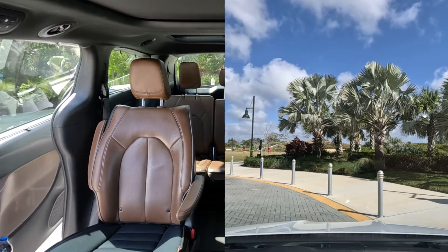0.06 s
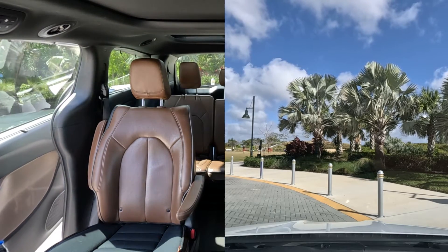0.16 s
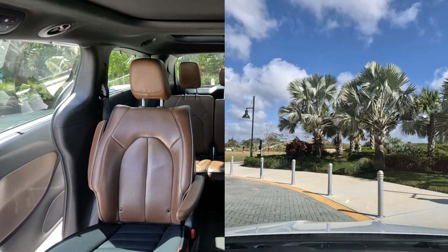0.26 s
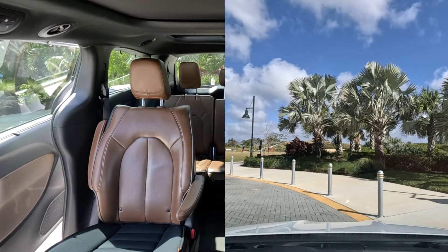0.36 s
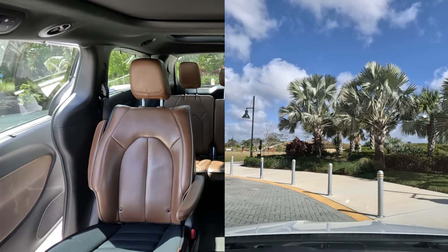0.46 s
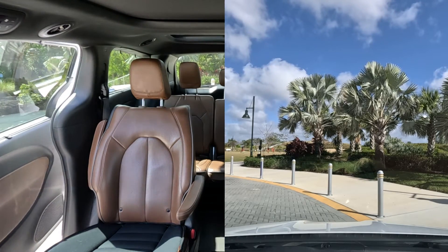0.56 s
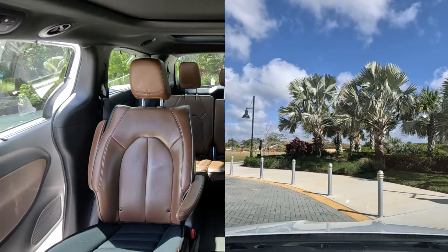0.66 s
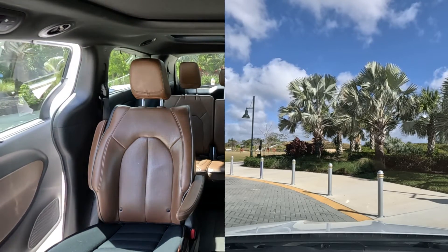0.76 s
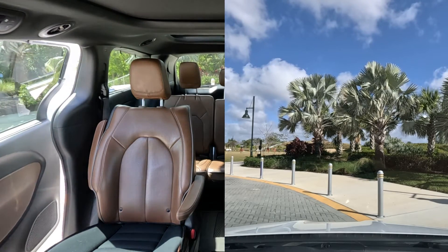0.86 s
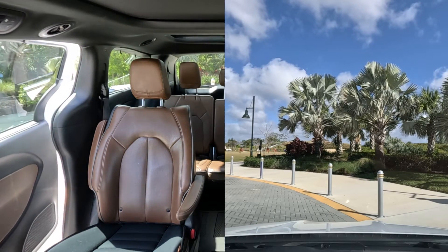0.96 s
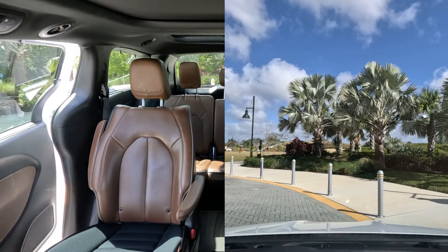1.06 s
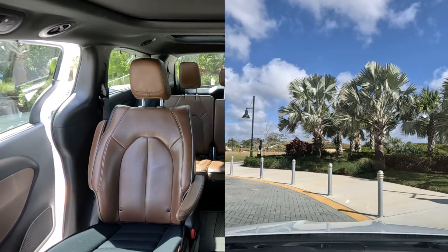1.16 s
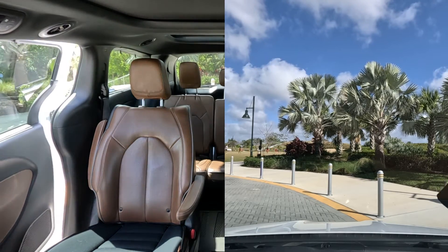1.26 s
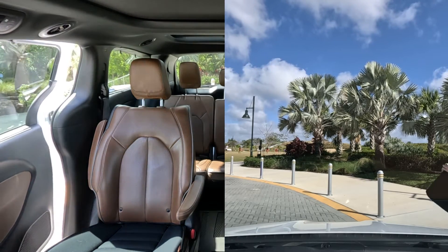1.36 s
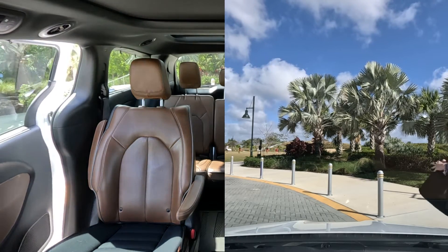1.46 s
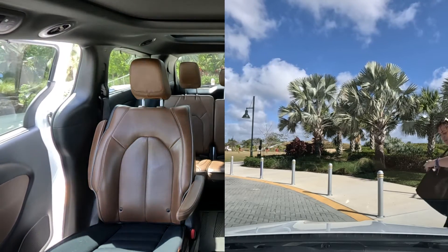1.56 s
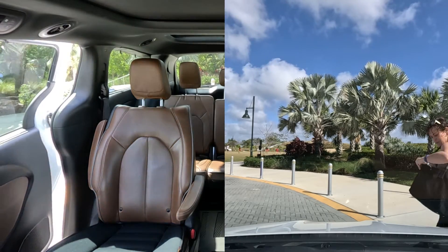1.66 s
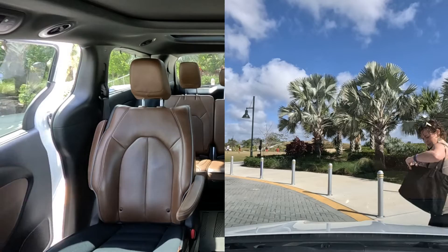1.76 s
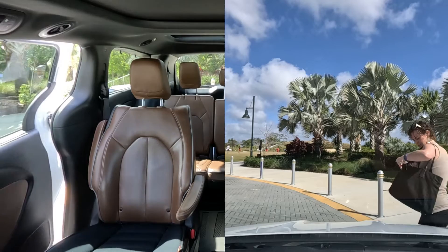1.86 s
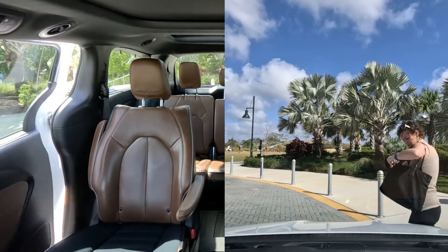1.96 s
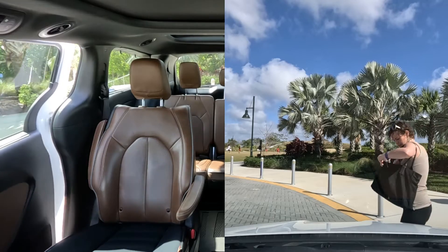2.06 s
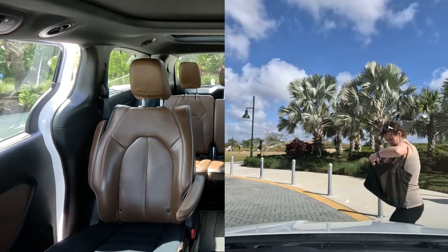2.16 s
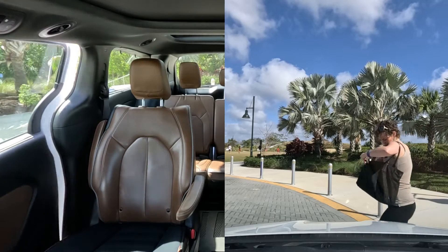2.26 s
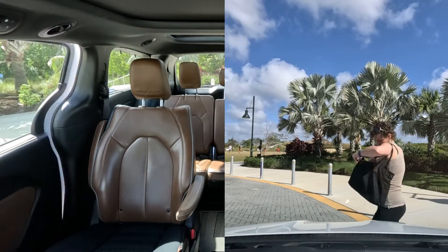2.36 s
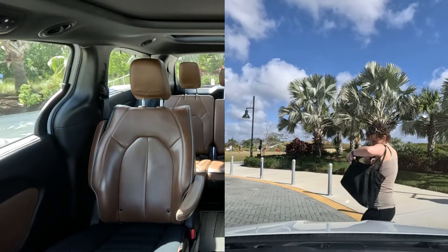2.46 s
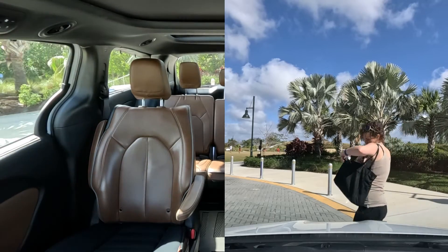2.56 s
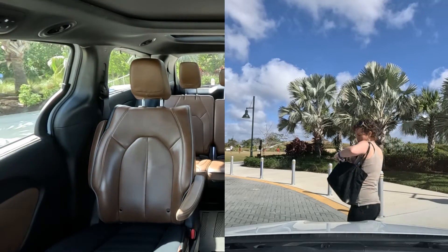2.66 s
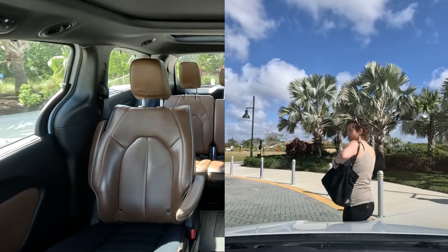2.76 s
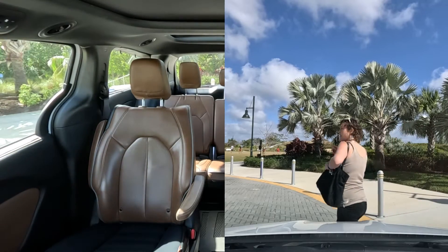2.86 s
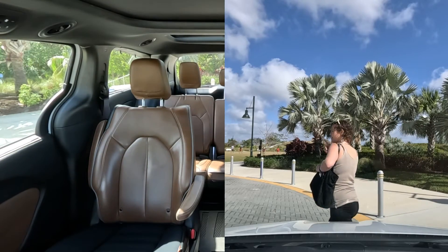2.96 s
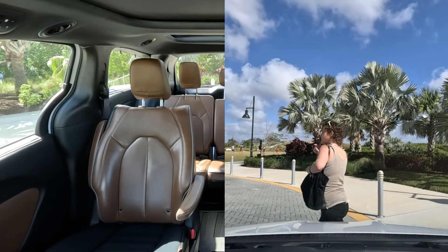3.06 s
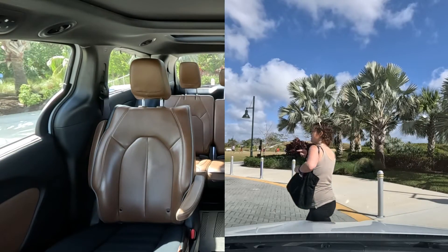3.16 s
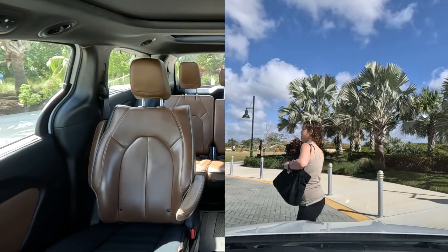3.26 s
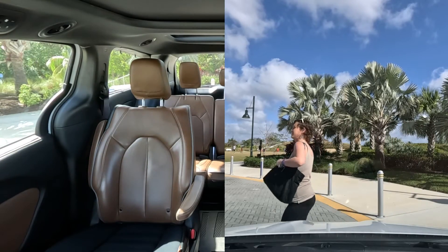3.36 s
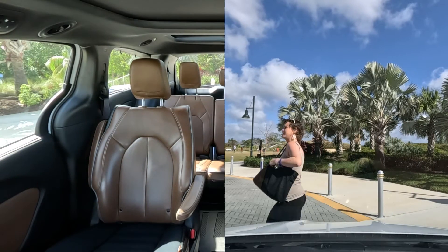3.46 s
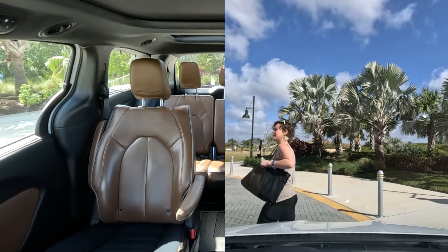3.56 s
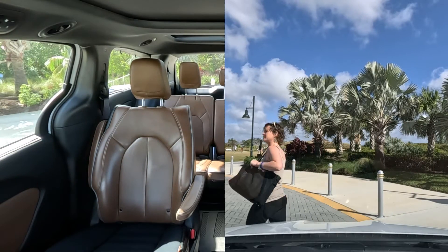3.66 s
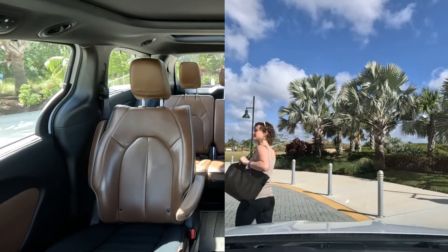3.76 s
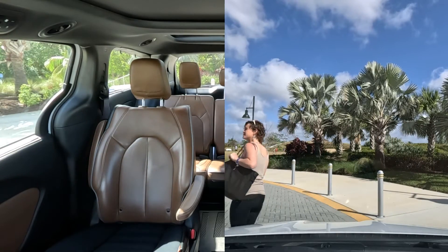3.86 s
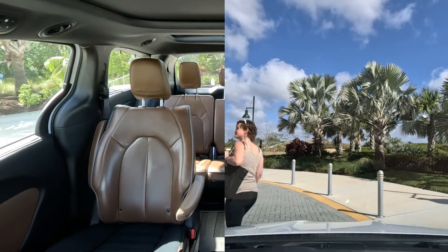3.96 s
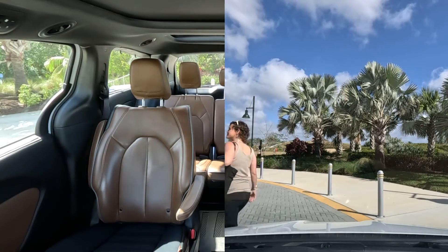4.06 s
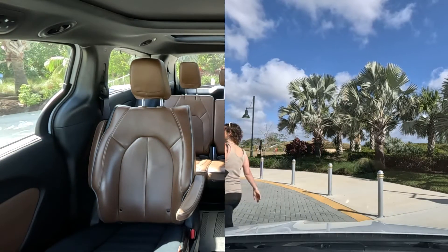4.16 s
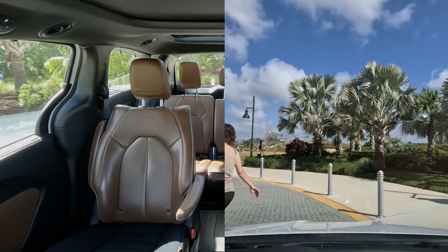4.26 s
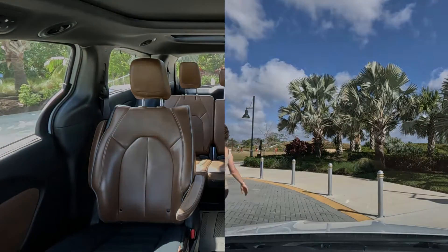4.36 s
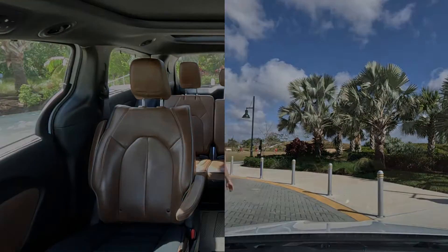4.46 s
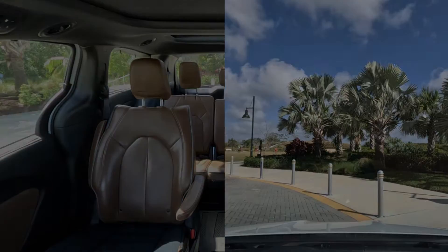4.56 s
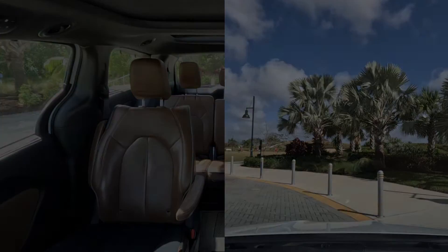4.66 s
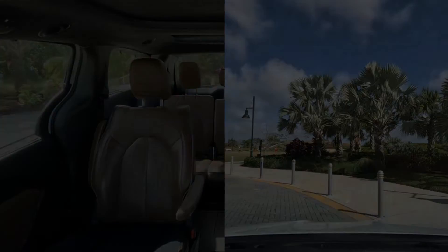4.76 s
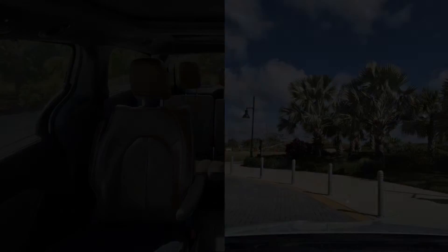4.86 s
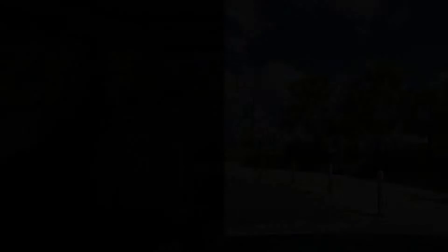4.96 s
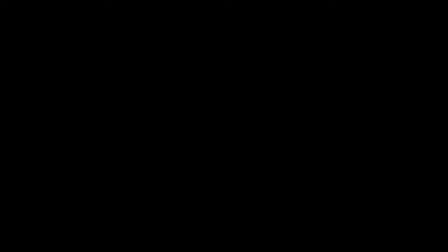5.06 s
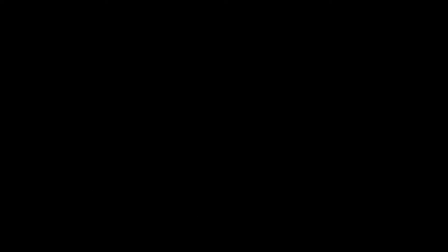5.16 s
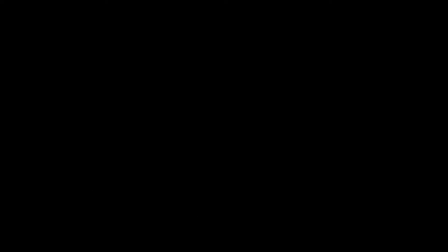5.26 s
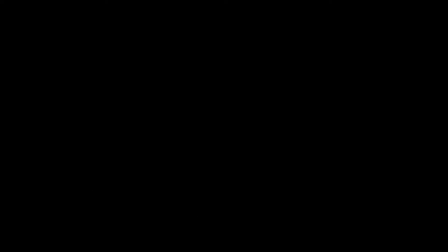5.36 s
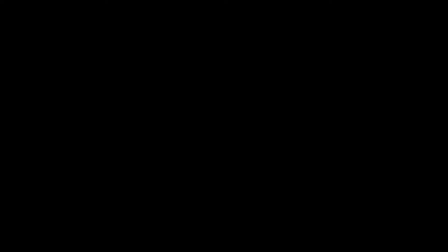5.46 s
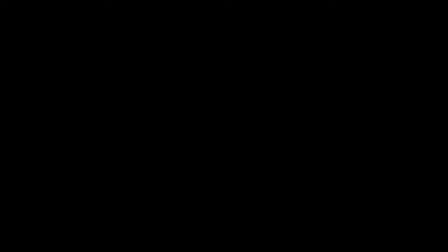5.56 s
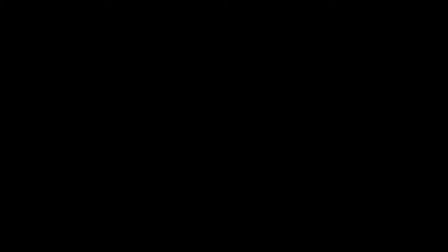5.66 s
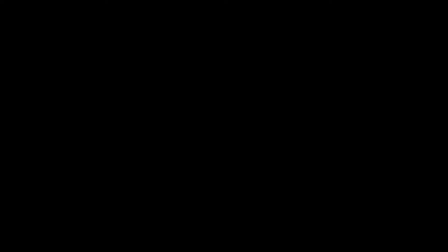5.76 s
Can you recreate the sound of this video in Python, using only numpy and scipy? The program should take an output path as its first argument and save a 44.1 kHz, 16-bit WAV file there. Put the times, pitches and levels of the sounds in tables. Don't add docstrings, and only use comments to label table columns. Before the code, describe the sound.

Heard from inside a parked van: a power sliding door rumbles along its rail with small knocks, faint squeaks and gritty scraping, while airy outdoor hiss enters the gap. It slams in a quick cluster of clunks, a small motor whines briefly, and the latch clicks back. Afterwards only quiet muffled traffic hum remains, fading out.

```python
import sys
import numpy as np
from scipy import signal
from scipy.io import wavfile
from scipy.ndimage import uniform_filter1d

SR = 44100
rng = np.random.default_rng(int(sys.argv[2]) if len(sys.argv) > 2 else 0)


def dump_mix(stems):
    frames = np.atleast_2d(stems).T
    limited = np.clip(frames, -1, 1)
    pcm = np.round(limited * 32767).astype(np.int16)
    wavfile.write(sys.argv[1], SR, pcm)


def magnitude_from_level(level_db):
    exponent = np.asarray(level_db, float) / 20
    return 10 ** exponent


N = 255996
SHUT_S = 2.56
EDGE_NOTCH_HZ, EDGE_NOTCH_WIDTH_HZ = 9030, 940


def rms_one(x):
    return x / np.sqrt(np.mean(x ** 2) + 1e-20)


def in_time(rows):
    s, *columns = np.transpose(rows)
    return [np.interp(np.arange(N) / SR, s, c) for c in columns]


def ramp(start_s, length_s):
    return np.clip((np.arange(N) / SR - start_s) / length_s, 0, 1)


def gate(start_s, end_s, edge_s):
    t = np.arange(N) / SR
    return np.clip(np.minimum(t - start_s, end_s - t) / edge_s + 1, 0, 1)


def drift(rate_hz):
    r = np.exp(-80 * np.pi * rate_hz / SR)
    chance = rng.standard_normal(N // 40 + 2002)
    slow = signal.lfilter([1], [1, -2 * r, r * r], chance)[2000:]
    return np.interp(np.arange(N) / 40, np.arange(len(slow)), rms_one(slow))


def band(x, low_hz, high_hz):
    return signal.sosfilt(signal.butter(2, [low_hz, high_hz], "band", fs=SR, output="sos"), x)


def resonate(x, hz, width_hz):
    r = np.exp(-np.pi * width_hz / SR)
    zeros = np.array([1, 0, -1]) * (1 - r * r) / 2
    return signal.lfilter(zeros, [1, -2 * r * np.cos(2 * np.pi * hz / SR), r * r], x)


def coloured(spectrum, patchy_db, rate_hz):
    hz, level_db = np.transpose(spectrum)
    edges_hz = hz[0] * 2 ** np.arange(0, np.log2(hz[-1] / hz[0]) + 1e-3, 1 / 3)
    together = drift(rate_hz)
    white = rng.standard_normal((2, N))
    out = 0
    for k, (low, high) in enumerate(zip(edges_hz, edges_hz[1:])):
        centre_db = np.interp(np.log(low * high) / 2, np.log(hz), level_db)
        flicker_db = patchy_db * (.7 * together + drift(rate_hz))
        out = out + magnitude_from_level(centre_db + flicker_db) * band(white[k % 2], low, high)
    return rms_one(out)


# time_s, level_db
ROLLER_LOAD = [
    (0.0, -29.5),
    (0.12, -33),
    (0.9, -33),
    (1.3, -36.5),
    (2.12, -38.5),
    (2.32, -38),
    (2.45, -30.5),
    (2.52, -27),
]
# freq_hz, density_db_per_hz
RAIL_SPECTRUM = [(18, -56), (30, -14.5), (65, -15), (102, -6), (140, -10.5), (178, 1), (243, 5.5),
                 (400, -11.5), (613, -25.5), (748, -15), (900, -19.5), (1170, -43), (1980, -120)]
# freq_hz, density_db_per_hz
OPEN_AIR_SPECTRUM = [(240, -30), (400, -1), (555, -2.5), (607, 7.5), (736, -12.5), (1260, -8.5),
                     (2810, -16.5), (3260, -15.5), (3950, -16.5), (6960, -25.5), (9090, -32), (10900, -35),
                     (14000, -61)]


def rail():
    load_db, = in_time(ROLLER_LOAD)
    rumble = magnitude_from_level(load_db + 1.0) * coloured(RAIL_SPECTRUM, patchy_db=0.0, rate_hz=36)
    narrowing_db = -4.5 * ramp(1.83, 0.32)
    seal_squeeze_db = 4.5 * ramp(2.33, .12)
    hiss_db = -42.5 + narrowing_db + seal_squeeze_db
    air = coloured(OPEN_AIR_SPECTRUM, patchy_db=1.1, rate_hz=12)
    hiss = magnitude_from_level(hiss_db) * (air + 1.2 * resonate(air, 10900, 570))
    hiss = hiss - resonate(hiss, EDGE_NOTCH_HZ, EDGE_NOTCH_WIDTH_HZ)
    return (rumble + hiss) * gate(-1, 2.5, 0.007)


# pitch_hz, level_db, t60_s
PANEL_MODES = [(167, -13, 0.087), (249, -0.5, 0.12), (329, 13, 0.09), (406, -8.5, 0.15), (600, -7.5, 0.05)]
LATCH_MODES = [(861.5, 11.5, 0.054), (1080, -2.5, 0.049), (1220, -4.5, 0.03), (1370, -7, 0.038),
               (1740, -21.5, .05), (1940, -12.5, 0.043), (2190, -20.5, .04)]
STEEL_MODES = [(2860, -3.5, 0.02), (2990, 3.5, 0.061), (3600, 2.2, 0.0072), (4042, -3, 0.05),
               (4430, -1.5, 0.085), (5370, -5, 0.048), (5720, -3, 0.015)]
TICK_MODES = [(6524, 1.5, 0.026), (6850, 1, 0.022), (8600, -7, .02), (9860, -15.5, .02), (10100, -5, .02),
              (12200, -7, 0.02), (13200, -15.5, .015)]


def blows(rows, bare_db, hold_s, t60_s):
    out, size = np.zeros(N), int(.22 * SR)
    t = np.arange(size) / SR
    parts = [(LATCH_MODES, 800, 2600), (PANEL_MODES, 150, 650),
             (STEEL_MODES, 2500, 6000), (TICK_MODES, 6000, 14200)]
    tail = magnitude_from_level(-27.0 - 60 * t / 0.38)
    for s, *levels_db, loudest_hz in rows:
        chance = rng.standard_normal((2, size))
        contacts = chance[0] * (rng.random(size) < .22) + tail * chance[1]
        spreads_db = rng.normal(0, 4.5, (4, 8))
        for (modes, low, high), db, spread_db in zip(parts, levels_db, spreads_db):
            rise = np.clip(t * low / 0.17, 0, 1)
            dying_s = np.clip(t - hold_s * (800 / low) ** .4, 0, None)
            fall = magnitude_from_level(-60 * dying_s / (t60_s * (700 / low) ** 0.24))
            rattle = contacts * rise * (fall + tail * magnitude_from_level(-30 * t * low / 2000))
            rings = sum(magnitude_from_level(mode_db + extra_db) * resonate(rattle, hz, 2.6 / d) * np.sqrt(d / 0.066)
                        for (hz, mode_db, d), extra_db in zip(modes, spread_db))
            sound = band(rings + magnitude_from_level(bare_db) * band(rattle, low, high), low, high)
            sound = sound + 2.0 * resonate(sound, loudest_hz, 0.077 * loudest_hz)
            peak = np.sqrt(uniform_filter1d(sound ** 2, size=300).max())
            i = max(int((s - .001) * SR), 0)
            out[i:i + size] += magnitude_from_level(db) * sound / peak
    return out


def parts_db(s, db, hard_db, loudest_hz, weight_db, tick_db):
    return s, db, db + weight_db, db + hard_db, db + hard_db + tick_db, loudest_hz


# start_s, level_db, hardness_db, loudest_hz, weight_db
LATCH_CLUNKS = [(2.314, -23, -10.5, 1180, -10), (2.337, -30, -1, 3800, 5), (2.426, -42.5, 4, 1120, 14),
                (2.478, -26, -6, 1280, 14), (2.503, -21, 2.1, 1650, 2), (2.524, -16.5, -1, 933, -2.5),
                (2.546, -30.5, -5, 1708, -13), (2.617, -43.5, -15, 1020, -12), (2.697, -52, -3.5, 1220, 11),
                (2.773, -44.5, 5.5, 3070, 7.5), (2.785, -36.5, -2.5, 2470, 4), (2.804, -44, -7, 1970, 8),
                (2.875, -43, -16.5, 2070, 2), (2.886, -26, -2.5, 1080, -3), (2.912, -40.5, -5.5, 1130, 6.5),
                (3.044, -37, -8.5, 4380, -1.5), (3.056, -39.5, -13, 1440, -2.5),
                (3.156, -54.5, -8, 1890, 9), (3.206, -56, -5.5, 2090, 9.5)]


def clunks():
    rows = [parts_db(*row, -12 if row[0] < SHUT_S else -20.5) for row in LATCH_CLUNKS]
    return blows(rows, bare_db=-0.5, hold_s=0.0064, t60_s=0.082)


# start_s, level_db, hardness_db, loudest_hz
RAIL_KNOCKS = [(0.007, -32.5, -18, 1370), (0.055, -36, -27, 1430), (0.095, -29, -14, 1470),
               (0.112, -39.5, -19, 1400), (0.144, -34, -13.5, 1400), (0.235, -48, -3, 1040),
               (0.319, -35, -22, 1320), (0.401, -36.5, -34, 1300), (0.486, -36.5, -16, 1050),
               (0.649, -60, 11.5, 1500), (0.743, -44, -10, 1370), (0.809, -40, 2, 4500),
               (0.871, -35.5, -32, 2750), (0.959, -45, -1.5, 2920), (1.062, -34, -8, 1740),
               (1.195, -49, -17, 1280), (1.345, -41.5, -22, 1290), (1.489, -43.5, -18, 1250),
               (1.59, -40.5, -24, 1240), (1.79, -51, 2, 2500), (1.922, -40, -28, 1350),
               (2.082, -42, -11, 1310), (2.133, -46.5, -24, 1040), (2.234, -43.5, -16, 1044)]


def knocks():
    rows = [parts_db(*row, weight_db=-4.5, tick_db=-21) for row in RAIL_KNOCKS]
    return blows(rows, bare_db=-2.0, hold_s=0.007, t60_s=0.088)


# start_s, length_s, pitch_hz, level_db
ROLLER_SQUEAKS = [(.2, .2, 5030, -63), (.31, .33, 3595, -54), (.38, .32, 4800, -61), (.84, .1, 2790, -58),
                  (.92, .11, 2890, -57), (.97, .33, 3425, -60), (1.0, .2, 4170, -61),
                  (1.25, .25, 4160, -56), (1.23, .18, 3760, -56), (1.42, .13, 3180, -56),
                  (1.62, .24, 3265, -56), (1.55, .21, 4955, -60), (1.14, .16, 6650, -66),
                  (1.35, .27, 6510, -66), (1.82, .2, 4800, -63), (1.86, .12, 3650, -63),
                  (2.13, .17, 3720, -61), (1.53, .09, 615, -46), (2.37, .1, 7250, -67),
                  (2.37, .06, 4120, -60), (2.37, .1, 3080, -57), (1.35, .15, 5150, -63),
                  (.07, .08, 4100, -58), (.9, .2, 5750, -65)]
# time_s, pitch_hz
ROLLER_WHINE = [
    (1.05, 7450),
    (1.28, 7020),
    (1.56, 6990),
    (1.65, 7200),
    (1.8, 7080),
    (2.0, 6520),
    (2.2, 6500),
    (2.3, 6700),
]


def squeaks():
    waver, flutter = drift(7.1) + 0.36 * drift(46), drift(40)
    whine_hz, = in_time(ROLLER_WHINE)
    whine_turn = 2 * np.pi * np.cumsum(whine_hz * (1 + .004 * waver)) / SR
    out = magnitude_from_level(-66 + 3.0 * flutter + 4.0 * drift(4)) * np.sin(whine_turn)
    out = out * gate(ROLLER_WHINE[0][0], ROLLER_WHINE[-1][0], .03)
    strays = [(2.1 * a, .08 + .2 * b, 2600 * 3.0 ** c, -65 - 8.0 * c) for a, b, c in rng.random((60, 3))]
    for k, (start_s, length_s, hz, db) in enumerate(ROLLER_SQUEAKS + strays):
        i, j = int(start_s * SR), int((start_s + length_s) * SR)
        own = slice(i + 1500 * k, j + 1500 * k)
        speed = (whine_hz[i:j] / whine_hz[i]) ** (.6 * (start_s > 1.8))
        turn = 2 * np.pi * np.cumsum(hz * speed * (1 + .0035 * waver[own])) / SR
        tone = np.sin(turn) + magnitude_from_level(-22) * np.sin(2 * turn) * (hz < 4300)
        level = magnitude_from_level(db + 3.5 + 1.3 * flutter[own])
        out[i:j] += level * signal.windows.tukey(j - i, .3) * tone
    return out


# start_s, end_s, level_db
ROLLER_SCRAPES = [
    (.0, 0.178, -59),
    (0.816, 1.05, -47.5),
    (1.2, 1.856, -56),
    (2.368, 2.477, -73),
]


def scrapes():
    grit = rng.standard_normal(N) * (rng.random(N) < 2500 / SR) * magnitude_from_level(3.0 * drift(31))
    ringing = sum(magnitude_from_level(db) * resonate(grit, hz, 150) for hz, db, _ in STEEL_MODES)
    steel = rms_one(band(ringing, 2500, 5000))
    return steel * sum(magnitude_from_level(db) * gate(start_s, end_s, 0.015) for start_s, end_s, db in ROLLER_SCRAPES)


# time_s, pitch_hz, level_db
CINCH_MOTOR = [
    (2.6, 301.4, -37),
    (2.66, 356.2, -38),
    (2.695, 380.6, -37.5),
    (2.735, 417, -32),
    (2.795, 451, -43),
    (2.83, 427, -39),
    (2.885, 410, -40),
]


def cinch():
    now = np.arange(N) / SR
    hz, motor_db = in_time(CINCH_MOTOR)
    turn = 2 * np.pi * np.cumsum(hz * (1 + 0.0034 * drift(40))) / SR
    mesh = magnitude_from_level(motor_db - 13 + 2.5 * drift(35)) * np.sin(2.03 * turn) * gate(2.67, 2.86, .02)
    whine = magnitude_from_level(motor_db + 1.5 + 1.8 * drift(35)) * np.sin(turn) + mesh

    noise = rng.standard_normal((2, N))
    whirr = rms_one(band(signal.lfilter([1], [1, -.93], noise[0]), 500, 3500))
    whirr = magnitude_from_level(-56.5) * whirr * (1 + 0.37 * np.sin(turn)) * gate(2.58, 2.88, .06)
    shudder = magnitude_from_level(-32 - 60 * np.clip(now - SHUT_S, 0, None) / 0.57)
    groan = (magnitude_from_level(-45) + shudder) * rms_one(band(noise[1], 60, 260)) * gate(2.58, 2.96, 0.072)

    t = np.clip(now - 2.7, 0, None)
    thud = magnitude_from_level(-38.5 - 60 * t / .6) * np.sin(2 * np.pi * 36 * t) * (1 - np.exp(-t / 0.025))
    reset = magnitude_from_level(-63) * np.sin(2 * np.pi * 425 * now) + magnitude_from_level(-94) * np.sin(2 * np.pi * 7983 * now)
    reset = reset * magnitude_from_level(2.0 * drift(8)) * gate(3.2, 4.0, .05)
    return whine * gate(2.61, 2.88, 0.02) + whirr + groan + thud + reset


# time_s, level_db
TRAFFIC_LEVEL = [
    (2.96, -51.5),
    (3.46, -47.5),
    (4.0, -44),
    (4.55, -43),
    (5.0, -44),
    (5.8, -42.5),
]
# freq_hz, density_db_per_hz
BOOM_SPECTRUM = [(15, -48.5), (25, -19.5), (69, -5), (92, -6), (130, -5.5), (252, -1), (502, -12),
                 (609, -6.5), (900, -31.5), (1170, -49.5), (1980, -120)]
# freq_hz, density_db_per_hz
MUFFLED_SPECTRUM = [(410, -32), (700, -2.5), (916, -1), (1130, -2), (2620, -12), (6880, -32), (9010, -52.5),
                    (11000, -43.5), (13000, -56)]
# pitch_hz, width_hz, level_db
CABIN_MODES = [(253.3, 100, 0.5), (340, 42, -5.5), (410, 23, -5)]


def cabin():
    traffic_db, = in_time(TRAFFIC_LEVEL)
    closed = ramp(2.55, 0.11)
    low_db = -47 * (1 - closed) + (traffic_db - 7) * closed
    drone_db = -50.5 * (1 - closed) + (traffic_db - 11) * closed
    low = rms_one(resonate(resonate(rng.standard_normal(N), 101, 18), 101, 18))
    drone = rms_one(resonate(resonate(rng.standard_normal(N), 610, 79), 610, 79))
    hums = magnitude_from_level(low_db + 1.0) * low + magnitude_from_level(drone_db + 0.76) * drone

    broad = coloured(BOOM_SPECTRUM, patchy_db=1.0, rate_hz=5.2)
    modes = sum(magnitude_from_level(db) * resonate(broad, hz, width_hz) * (-1) ** k
                for k, (hz, width_hz, db) in enumerate(CABIN_MODES))
    boom = magnitude_from_level(traffic_db + 1.5) * rms_one(broad + 1.2 * modes)
    loudest_db = traffic_db.max()
    hiss_db = loudest_db - 10.5 + 1.2 * (traffic_db - loudest_db)
    hiss = magnitude_from_level(hiss_db) * coloured(MUFFLED_SPECTRUM, patchy_db=0.87, rate_hz=9)
    return hums + (boom + hiss) * gate(1.94, 9, .06)


def scene():
    mono = rail() + clunks() + knocks() + squeaks() + scrapes() + cinch() + cabin()
    dip_hz, dip_width_hz = 743, 30
    mono = signal.lfilter(*signal.iirnotch(dip_hz, dip_hz / dip_width_hz, SR), mono) + 0.33 * mono
    return np.array([mono, mono]) / 1.363


def roll_off(x):
    return signal.sosfilt(signal.butter(12, 14260, fs=SR, output="sos"), x)


def record(dry):
    notch = signal.iirnotch(EDGE_NOTCH_HZ, EDGE_NOTCH_HZ / EDGE_NOTCH_WIDTH_HZ, SR)
    x = signal.lfilter(*notch, dry * (1 - ramp(4.926, 0.9)))
    x = signal.sosfilt(signal.cheby2(6, 8, 11900, fs=SR, output="sos"), x)
    x = np.tanh(x)
    top = band(x[0], 11200, 15000)
    unlike = top * drift(200) * magnitude_from_level(-6) + top * magnitude_from_level(-12)
    x = x + unlike * [[-1], [1]] + magnitude_from_level(-100) * rng.standard_normal(N)
    x = signal.sosfilt(signal.cheby2(12, 60, 14300, fs=SR, output="sos"), x)
    return roll_off(x)


dry = scene()
out = record(dry)
dump_mix(out)
```